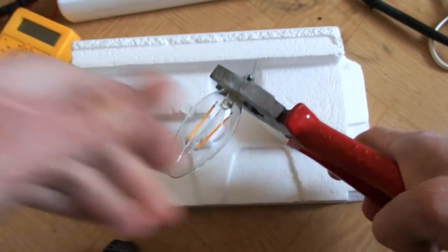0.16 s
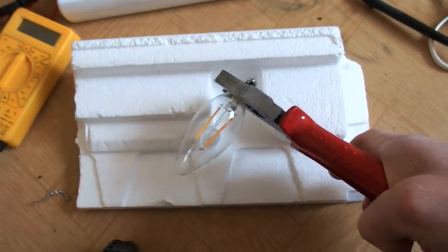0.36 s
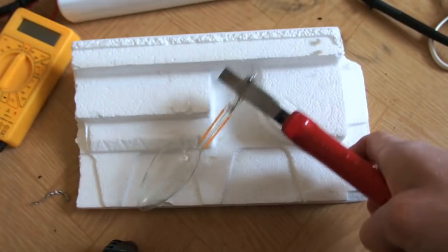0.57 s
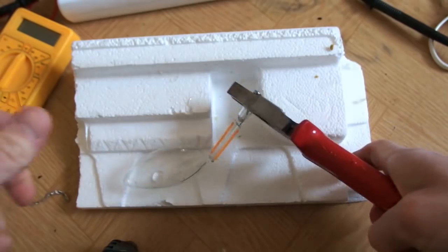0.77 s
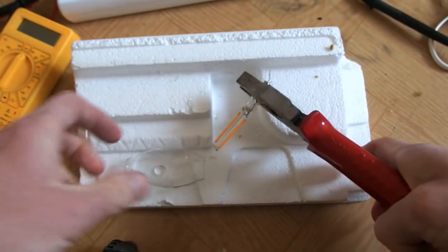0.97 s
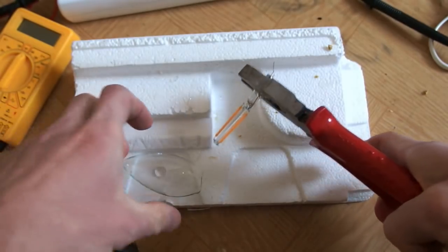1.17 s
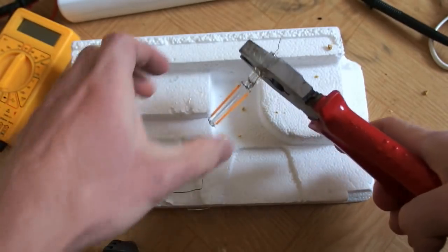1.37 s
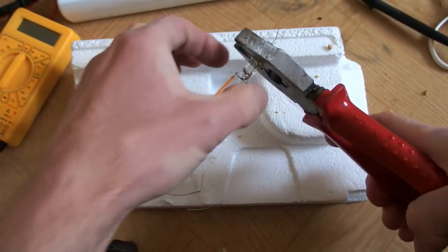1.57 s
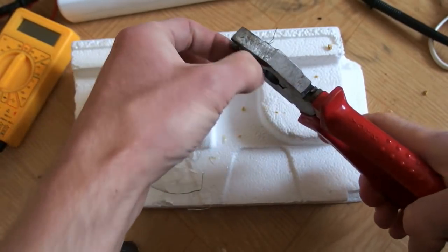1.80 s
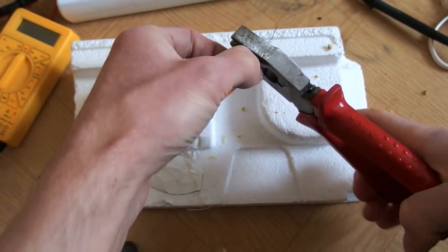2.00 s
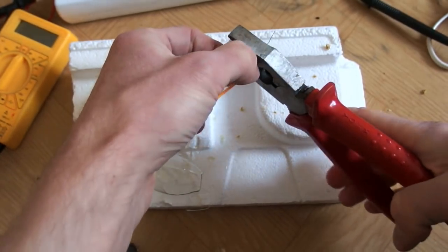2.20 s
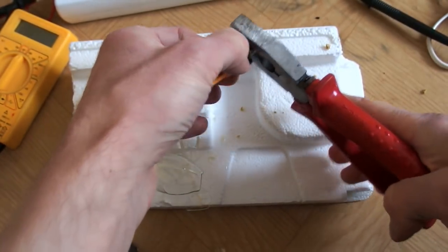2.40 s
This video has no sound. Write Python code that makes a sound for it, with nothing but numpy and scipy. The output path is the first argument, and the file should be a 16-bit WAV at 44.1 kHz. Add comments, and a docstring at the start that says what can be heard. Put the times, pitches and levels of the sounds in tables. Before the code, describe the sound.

A small light bulb bursts with a sharp crack at 0.2 seconds, after a few faint ticks of pliers on glass. Splinters patter and ping until about 0.7 seconds while the loose shell bumps onto a foam block, clinking again near 0.9. After a lull, the broken stem grates softly from 1.8 to 2.4 seconds, with a dull bump and a thin squeak. Close, over a low room rumble.

```python
"""A few faint ticks of pliers on thin glass, then a small light bulb bursts over a foam block.
Splinters patter down, shards ping, and the loose shell drops, bumps the block and clinks as it rolls.
After a lull the broken stem grates and squeaks in the jaws as fingers work at it.
Heard from a close pair of microphones at a workbench in a small room, over a low, steady rumble."""
import sys
import numpy as np
from scipy import signal
from scipy.fft import rfft, irfft, next_fast_len
from scipy.io import wavfile
from scipy.ndimage import uniform_filter1d

SR = 44100
rng = np.random.default_rng(int(sys.argv[2]) if len(sys.argv) > 2 else 0)


def file_out(sig):
    """Save sig as 16-bit WAV at sys.argv[1]."""
    # one column per channel
    cols = np.atleast_2d(sig).T
    # limit, then scale
    lim = np.clip(cols, -1, 1)
    pcm = np.round(lim * 32767).astype(np.int16)
    wavfile.write(sys.argv[1], SR, pcm)


N = 108045
HIT_S, LEVEL_WINDOW_S = .32, .01
TOP_HZ = 15750


def amp(db):
    """Decibels to gain."""
    return 10 ** (np.asarray(db) / 20)


def fade(t60, length_s=HIT_S):
    """Exponential decay that falls 60 dB in t60 seconds."""
    return np.exp(-np.log(1000) * np.arange(int(length_s * SR)) / SR / max(t60, 1e-4))


def unit(x):
    """Give a hit the energy of a unit level held for the level window."""
    return x * np.sqrt(LEVEL_WINDOW_S * SR / np.sum(x ** 2))


def colour(x, points):
    """Causal filter through (Hz, dB) points."""
    size = 2 * next_fast_len(len(x))
    hz, db = np.array(points, float).T
    log_hz = np.log(np.fft.rfftfreq(size, 1 / SR) + 1)
    cepstrum = irfft(np.log(amp(np.interp(log_hz, np.log(hz), db))))
    cepstrum[1:size // 2] *= 2  # minimum phase: nothing sounds ahead of a hit
    cepstrum[size // 2 + 1:] = 0
    return irfft(rfft(x, size) * np.exp(rfft(cepstrum)))[:len(x)]


def crack(points, t60):
    """A short coloured burst of contact noise."""
    decay = fade(t60)
    return unit(colour(rng.choice([-1, 1], len(decay)) * decay, points))


def ring(modes):
    """Struck modes (Hz, relative dB, t60 in seconds), each at its own phase."""
    t = np.arange(int(HIT_S * SR)) / SR
    out = np.zeros(len(t))
    for hz, db, t60 in modes:
        attack = 1 - np.exp(-2 * hz * t)
        out += amp(db) * fade(t60) * attack * np.sin(2 * np.pi * (hz * t + rng.random()))
    return unit(out)


def add(out, start_s, sound):
    """Mix a sound in at its time."""
    i = int(start_s * SR)
    out[i:i + len(sound)] += sound[:N - i]


def room_tone(level_db=-56.5, width_hz=70):
    """The room behind the bench: a low rumble under faint hiss, with a few wavering resonances."""
    # Rumble and hiss. Each row: frequency in Hz, relative level in dB.
    spectrum = [(15, -39), (25, -16.5), (49, -4), (96, -0.5), (209, -13.5), (267, -16.5), (399, -20.5),
                (804, -24), (919, -20), (1110, -32.5), (1200, -28.5), (1340, -24.5), (1620, -26),
                (2630, -27.5), (3720, -28), (8810, -34.5), (15500, -32.5)]
    # Narrow resonances. Each row: centre in Hz, level in dB.
    peaks = [(900, -84.5), (1050, -73.5), (1260, -84.5), (1550, -73)]
    noise = colour(rng.standard_normal(N), spectrum)
    out = amp(level_db) * noise / np.std(noise)
    for hz, db in peaks:
        band = signal.lfilter(*signal.iirpeak(hz, hz / width_hz, fs=SR), rng.standard_normal(N))
        out += amp(db) * band / np.std(band)
    return out


def reflections(dry, bench_db, bench_t60=.075, build_s=.008):
    """Quick echoes off the bench, then the small room's tail, dying band by band."""
    # The tail. Each row: band centre in Hz, level in dB, t60 in seconds.
    bands = [(100, -2.5, 0.16), (393, -6.5, 0.49), (1400, -5.5, 0.6), (3520, -5.5, 0.59), (7150, -8.5, 0.4),
             (14000, -14, 0.24)]
    t = np.arange(SR) / SR
    log_hz = np.log(np.fft.rfftfreq(SR, 1 / SR) + 1)
    log_centres = np.log([row[0] for row in bands])
    noise_spectrum = rfft(rng.standard_normal(SR))
    near = rng.standard_normal(SR) * fade(bench_t60, 1) * (t > build_s / 10)
    response = amp(bench_db) * near / np.linalg.norm(near)
    for share, (_, db, t60) in zip(np.eye(len(bands)), bands):
        band = irfft(noise_spectrum * np.interp(log_hz, log_centres, share), SR)
        envelope = fade(t60, 1) * (1 - np.exp(-t / build_s))
        response += amp(db) * band * envelope / np.linalg.norm(envelope)
    return signal.fftconvolve(dry, response)[:N]


def block_and_handling(contact_t60=.067, tap_t60=.051, boom_s=.302, boom_db=-34):
    """Damped knocks, finger rubs, taps and thuds; the falling shell sets the foam block booming."""
    # Light knocks on block and pliers, then soft finger rubs near the end.
    # Each row: start in seconds, level in dB, pitch in Hz.
    contacts = [(.0295, -53, 1320), (.0875, -52, 1280), (.1560, -54, 980), (.1680, -55, 920),
                (.2140, -38.5, 2110), (.2530, -41.5, 800), (.2680, -33, 1750), (.2870, -32, 1390),
                (.2960, -35.5, 302), (.3135, -25.5, 903), (.3190, -38, 960), (.3370, -44, 490),
                (.3880, -39.5, 260), (0.6041, -47, 1330), (.8535, -69, 617), (0.881, -49.5, 468),
                (0.906, -53.5, 338), (1.898, -53.5, 1700), (2.154, -60.5, 1200), (2.178, -59.5, 1200),
                (2.327, -55.5, 1260)]
    # Soft one-note taps on the block. Each row: start in seconds, level in dB, pitch in Hz.
    taps = [(.0290, -58.5, 507), (0.088, -50, 507), (.6050, -49.5, 1150), (.9250, -47.5, 686),
            (1.150, -55, 409), (1.895, -50.5, 416)]
    # Dull bumps on block and bench. Each row: start in seconds, level in dB.
    bumps = [(0.223, -56), (0.294, -51.5), (0.318, -46), (.4100, -42.5), (0.852, -63), (1.895, -37),
             (1.938, -44.5), (2.250, -52)]
    # Their short thud and lingering boom. Each row: pitch in Hz, relative level in dB, t60 in seconds.
    thud_modes = [(69.6, 3, 0.091), (97, -1, .1), (152, -8, 0.13), (177, -1, 0.036)]
    boom_modes = [(114.6, 0, .3), (289, -14, .2)]
    out = np.zeros(N)
    for start_s, db, hz in contacts:
        hump = [(hz / 4, -15), (hz / 1.09, -2), (hz, 0), (hz * 1.22, -2), (hz * 3, -20), (TOP_HZ, -36)]
        add(out, start_s, amp(db) * crack(hump, contact_t60))
    for start_s, db, hz in taps:
        add(out, start_s, amp(db) * ring([(hz, 0, tap_t60)]))
    for start_s, db in bumps:
        add(out, start_s, amp(db) * ring(thud_modes))
    add(out, boom_s, amp(boom_db) * ring(boom_modes))
    return out


def stem_squeak(start_s=2.246, slip_s=2.342, release_s=.005, centre_hz=11200, width_hz=220, db=-57):
    """A thin squeak of glass on steel swells until the stem slips."""
    band = rng.standard_normal(N)
    for _ in range(2):
        band = signal.lfilter(*signal.iirpeak(centre_hz, centre_hz / width_hz, fs=SR), band)
    swell = np.interp(np.arange(N) / SR, [start_s, slip_s, slip_s + release_s], [0, 1, 0])
    return amp(db) * swell * band / np.std(band)


def stem_grating(ring_db=-12, rise_s=.0015):
    """Glass crumbs grate between the broken stem and the jaws and ring them."""
    # Single scrapes. Each row: start in seconds, level in dB, t60 in seconds.
    grates = [(1.371, -59.5, 0.032), (1.654, -63.5, .03), (1.8160, -54, .035), (1.8315, -55, 0.06),
              (1.8610, -46.5, 0.023), (1.8640, -45.5, 0.015), (2.151, -55.5, 0.043), (2.1880, -55.5, .08),
              (2.2058, -56, 0.044), (2.3092, -46.5, 0.12), (2.3280, -69, 0.055), (2.3406, -54, 0.016),
              (2.3439, -40.5, 0.0087), (2.3590, -46, .016)]
    # Colour of the grit. Each row: frequency in Hz, relative level in dB.
    grit_colour = [(500, -22.5), (1400, -23), (3000, -14), (4400, -11.5), (5500, -4.5), (6300, -7),
                   (6950, 2), (7800, -7), (10000, -8.5), (11300, -12.5), (12500, -15), (16000, -5.5)]
    # Ring of stem and jaws. Each row: pitch in Hz, relative level in dB, t60 in seconds.
    stem_modes = [(1050, -7, 0.074), (1600, -4, 0.2), (2235, -7.5, 0.07), (6580, 2, 0.026),
                  (6630, 13, 0.037), (6930, -7, 0.033), (7600, -13, 0.027)]
    out = np.zeros(N)
    rise = 1 - np.exp(-np.arange(int(HIT_S * SR)) / SR / rise_s)
    for start_s, db, t60 in grates:
        grit = unit(rise * crack(grit_colour, t60))
        add(out, start_s, amp(db) * (grit + amp(ring_db) * ring(stem_modes)))
    return out


def jaw_bites(ring_db=-2, tick_db=-3, tick_t60=.026):
    """The jaws slip in small steps and ring the unbroken bulb."""
    # Slips of the jaws. Each row: start in seconds, level in dB.
    bites = [(0.0356, -48), (0.043, -46), (0.0504, -40.5), (0.069, -41.5)]
    # Ring of the whole bulb. Each row: pitch in Hz, relative level in dB, t60 in seconds.
    bulb_modes = [(4570, -3.5, 0.018), (10640, 2.5, 0.035), (11100, 5, 0.013), (13000, -9, .025),
                  (13000, -6, 0.031), (14150, -3, 0.035), (15200, -14, .02)]
    # Colour of the tick. Each row: frequency in Hz, relative level in dB.
    tick_colour = [(500, -11), (3700, -16), (4500, -7.5), (8000, -11), (11000, -9), (16000, -5.5)]
    out = np.zeros(N)
    for start_s, db in bites:
        bite = amp(ring_db) * ring(bulb_modes) + amp(tick_db) * crack(tick_colour, tick_t60)
        add(out, start_s, amp(db) * bite)
    return out


def loose_shell(contact_db=-1, contact_t60=.031, ring_db=-1):
    """The loose shell rocks: soft touches sound its hollow note, hard ones its bright ring."""
    # Touches. Each row: start in seconds, bright level in dB, hollow level in dB.
    clinks = [(.4150, -64, -36), (0.843, -70, -40.5), (.8480, -31, -36.5), (0.854, -38.5, -32),
              (0.8815, -92, -39.5), (.9025, -37.5, -57)]
    # Bright ring and hollow note. Each row: pitch in Hz, relative level in dB, t60 in seconds.
    bright_modes = [(2254, -13, 0.11), (3650, -13.5, 0.066), (4200, -21, 0.24), (8020, -23.5, 0.13),
                    (8020, -10, .12), (8845, -13, 0.33), (10560, -14, 0.063), (13480, 1, 0.058),
                    (12600, -4, 0.086), (13840, 2.5, 0.061)]
    hollow_modes = [(1170, -5, .028), (1335, 0, .03), (1520, -6, .025), (1760, -10, .025), (2330, -10, .03)]
    # Colour of the glass contact. Each row: frequency in Hz, relative level in dB.
    contact_colour = [(150, -28), (450, 1.5), (700, 4), (2300, -1), (4600, 1), (5800, -6), (9000, -1),
                      (13000, 3.5), (16000, 1)]
    out = np.zeros(N)
    for start_s, bright_db, hollow_db in clinks:
        bright = amp(ring_db) * ring(bright_modes) + amp(contact_db) * crack(contact_colour, contact_t60)
        add(out, start_s, amp(bright_db) * bright + amp(hollow_db) * ring(hollow_modes))
    return out


def shards(tick_t60=.009, ring_db=-4, ring_t60=.073, fall_db_per_octave=2, mode_count=7):
    """Each shard ticks and rings briefly with modes of its own; slivers give one high ping."""
    # Larger shards landing. Each row: start in seconds, level in dB, tilt in dB per octave.
    landings = [(.2700, -29.5, 8), (0.2967, -33, 1), (0.3287, -43, -14.5), (0.3486, -47, -7),
                (.3610, -51, 9), (0.3811, -36, 4.5), (0.385, -35, -2), (0.3995, -33, 2.5),
                (0.439, -39.5, 6.5), (0.4945, -51, 0), (0.5248, -44.5, -2), (0.5303, -48, 6),
                (0.5755, -49, 7), (0.5897, -60, -8), (.6060, -49.5, -7), (0.6439, -52.5, -6.5),
                (.6760, -51.5, -5), (0.6824, -54, 4), (.6930, -58, -4), (0.705, -52, -2), (.7130, -61, 0),
                (0.765, -62, -4.5)]
    # Colour of a tick before its tilt. Each row: frequency in Hz, relative level in dB.
    tick_colour = [(200, -48.5), (800, -41), (1500, -1), (4000, 3.5), (5500, -1), (10500, -2),
                   (16000, -4.5)]
    # Slivers. Each row: start in seconds, pitch in Hz, level in dB, t60 in seconds.
    pings = [(.2720, 12800, -48, .04), (.3470, 12000, -42.5, 0.028), (.3510, 13400, -46, .03),
             (.3605, 14950, -35, .07), (.3900, 12100, -44, .02), (.4000, 13850, -50, .12),
             (.4400, 13830, -45, 0.16), (.4430, 14850, -38, .09)]
    low_hz, high_hz = 2500, 15000
    out = np.zeros(N)
    for start_s, db, tilt in landings:
        tick = crack([(hz, level + tilt * np.log2(hz / low_hz)) for hz, level in tick_colour], tick_t60)
        pitches = low_hz + (high_hz - low_hz) * (np.arange(mode_count) + rng.random(mode_count)) / mode_count
        modes = [(hz, (tilt - fall_db_per_octave) * np.log2(hz / low_hz), ring_t60) for hz in pitches]
        add(out, start_s, amp(db) * (tick + amp(ring_db) * ring(modes)))
    for start_s, hz, db, t60 in pings:
        add(out, start_s, amp(db) * ring([(hz, 0, t60)]))
    return out


def splinters(start_s=.232, length_s=.5, level_db=-24.5, count=640, grain_t60=.0075):
    """Tiny splinters patter down, ever fewer and weaker."""
    # Colour of the patter. Each row: frequency in Hz, relative level in dB.
    patter_colour = [(150, -22.5), (450, -21), (850, -19.5), (1500, 9.5), (2600, 1), (4000, 2), (5500, -3),
                     (10000, -7), (16000, -11.5)]
    scatter_db, fall_db_per_s = 5, 45
    out = np.zeros(N)
    decay = fade(grain_t60, length_s=.016)
    for _ in range(count):
        age_s = length_s * rng.random() ** 1.4
        db = scatter_db * np.clip(rng.standard_normal(), -2, 2) - fall_db_per_s * age_s
        add(out, start_s + age_s, amp(db) * decay * rng.standard_normal(len(decay)))
    return amp(level_db) * unit(colour(out, patter_colour))


def bulb_burst(ring_s=.2245, ring_db=-19):
    """Fractures run through the glass within a few milliseconds; it rings as it parts."""
    # Cracks in the bulb. Each row: start in seconds, level in dB, t60 in seconds.
    fractures = [(.2220, -25.5, 0.035), (0.2238, -20.5, 0.012), (0.2281, -21.5, 0.026)]
    # Colour of a fracture. Each row: frequency in Hz, relative level in dB.
    fracture_colour = [(40, -19), (120, -1.5), (400, -3.5), (1200, 1.5), (2000, 2), (3500, 1.5),
                       (5000, -3.5), (7500, -2.5), (11000, 2), (13000, -7.5), (16000, 1.5)]
    # Ring of the parting glass. Each row: pitch in Hz, relative level in dB, t60 in seconds.
    burst_modes = [(1107, -5.5, 0.055), (1310, -2, 0.02), (2430, -10.5, 0.02), (3630, 3, 0.013),
                   (6080, -2.5, 0.021), (6660, -7.5, 0.044), (7000, -13.5, 0.0327), (7600, 1, 0.021),
                   (12350, -2.5, 0.033), (13400, -0.5, 0.0316), (14690, -4, 0.041)]
    out = np.zeros(N)
    for start_s, db, t60 in fractures:
        add(out, start_s, amp(db) * crack(fracture_colour, t60))
    add(out, ring_s, amp(ring_db) * ring(burst_modes))
    return out


def gain_control(x, threshold_db=-50, slope=.41, lag_s=.15):
    """The recorder's slow gain control backs off after loud sounds and creeps back up."""
    power = uniform_filter1d(np.mean(x ** 2, axis=0), int(LEVEL_WINDOW_S * SR))
    over_db = np.maximum(10 * np.log10(np.abs(power) + 1e-12) - threshold_db, 0)
    pole = np.exp(-1 / (lag_s * SR))
    for _ in range(2):
        over_db = signal.lfilter([1 - pole], [1, -pole], over_db)
    return x * amp(-slope * over_db)


def scene():
    """All sources sit in front of two close microphones, whose echoes differ mostly in the treble."""
    # Stereo width of the echoes and of the room tone. Each row: frequency in Hz, side gain in dB.
    echo_width = [(100, -29), (300, -24.5), (600, -27), (1200, -18), (2600, -22.5), (5000, -9.5),
                  (8000, -7.5), (16000, -5.5)]
    tone_width = [(100, -7.5), (900, -6), (4000, -1.5)]
    direct = jaw_bites() + bulb_burst() + splinters() + shards() + loose_shell()
    direct += block_and_handling() + stem_grating() + stem_squeak()
    mid_echoes = reflections(direct, bench_db=-13)
    side_echoes = reflections(direct, bench_db=0)
    mid = direct + mid_echoes + room_tone()
    side = colour(side_echoes, echo_width) + colour(room_tone(), tone_width)
    return np.array([mid + side, mid - side])


def record(dry, low_cut_hz=44):
    """The recorder thins the deepest bass, rides the gain and cuts the top."""
    low_cut = signal.butter(2, low_cut_hz, "high", fs=SR, output="sos")
    top_cut = signal.ellip(10, .2, 80, TOP_HZ, fs=SR, output="sos")
    levelled = gain_control(signal.sosfilt(low_cut, dry))
    return signal.sosfilt(top_cut, levelled)


dry = scene()
out = record(dry)
file_out(out)
```